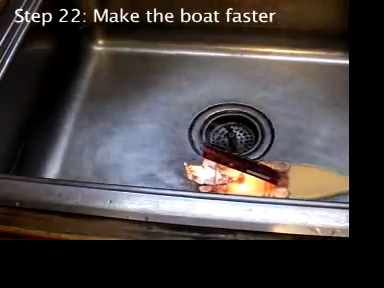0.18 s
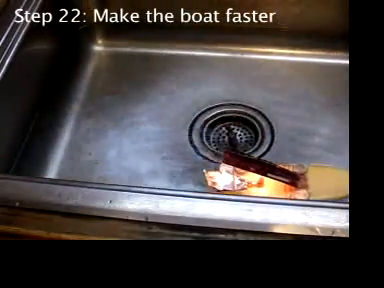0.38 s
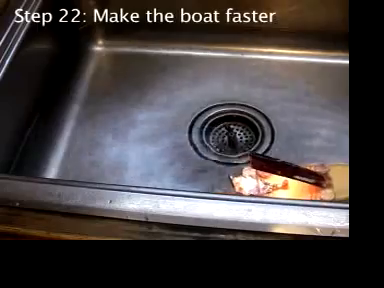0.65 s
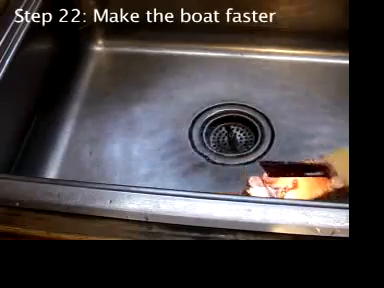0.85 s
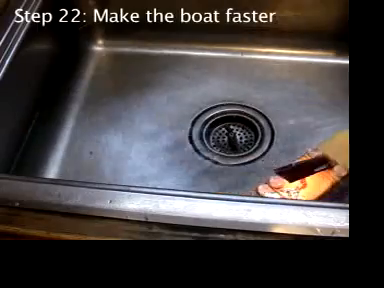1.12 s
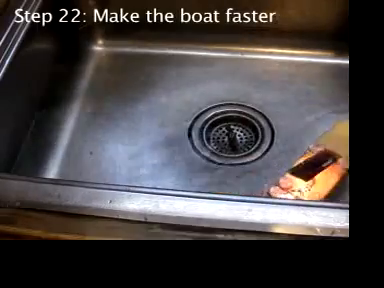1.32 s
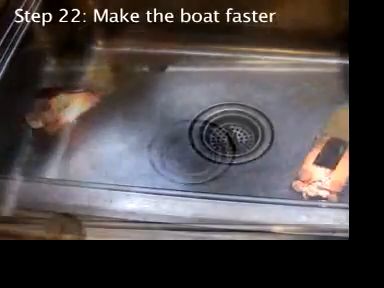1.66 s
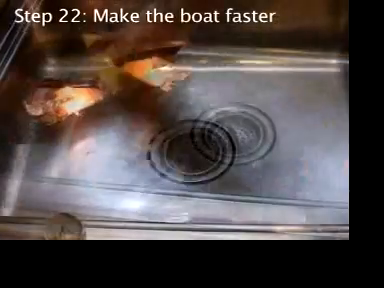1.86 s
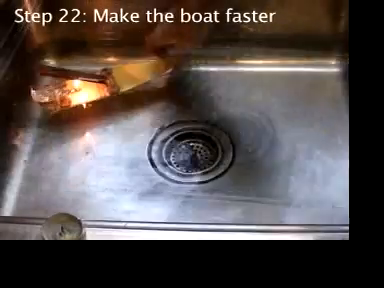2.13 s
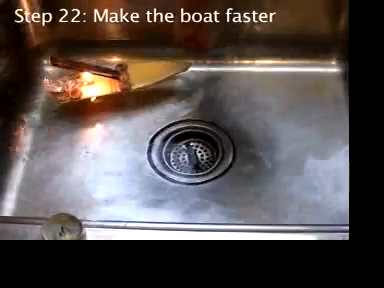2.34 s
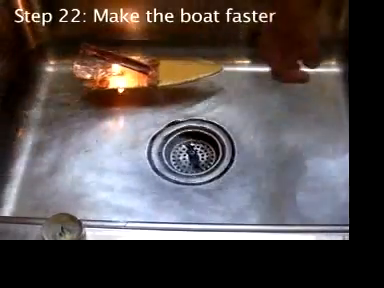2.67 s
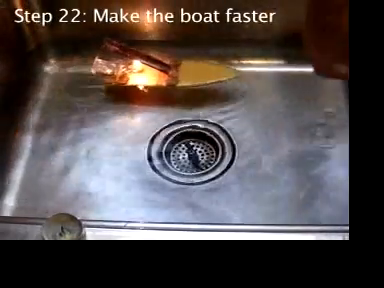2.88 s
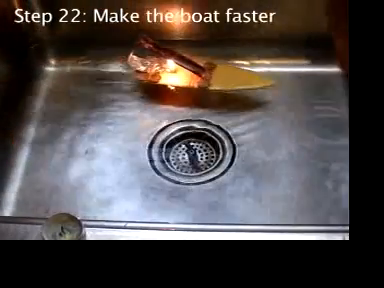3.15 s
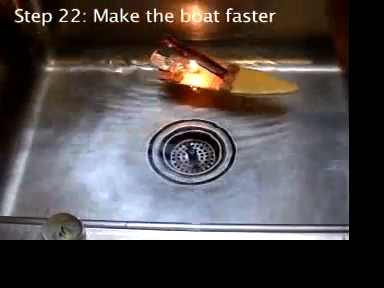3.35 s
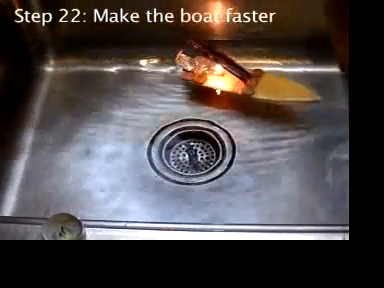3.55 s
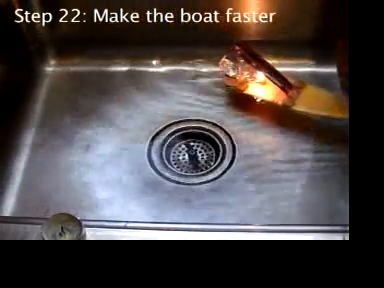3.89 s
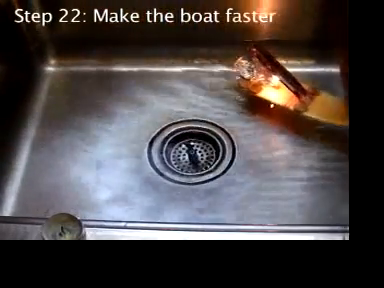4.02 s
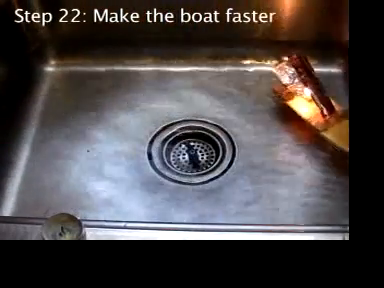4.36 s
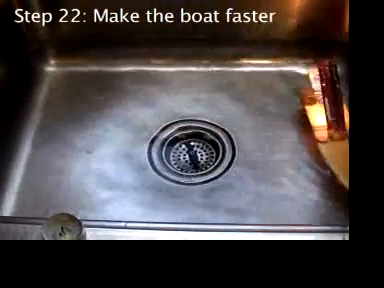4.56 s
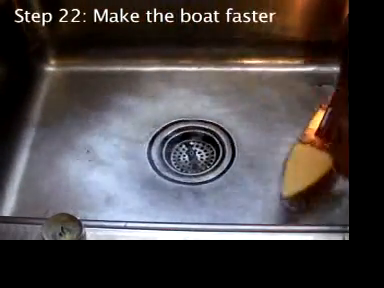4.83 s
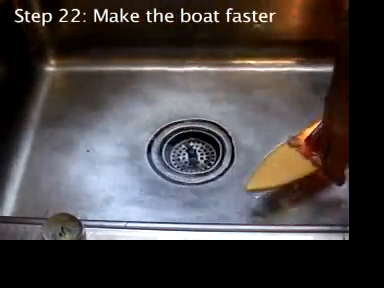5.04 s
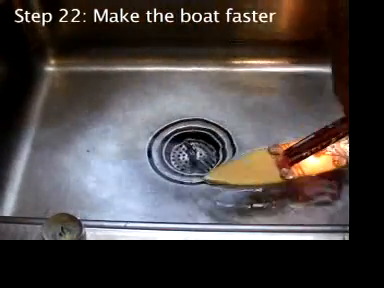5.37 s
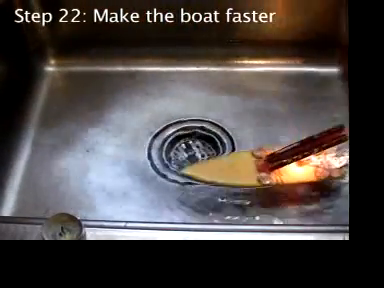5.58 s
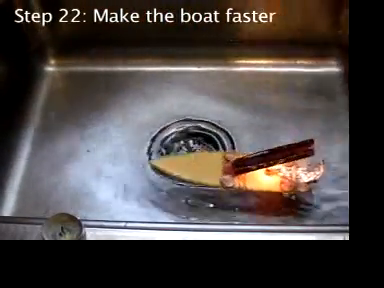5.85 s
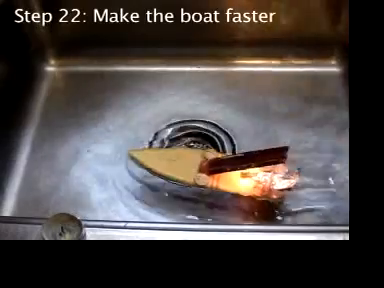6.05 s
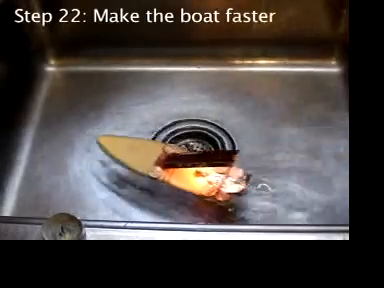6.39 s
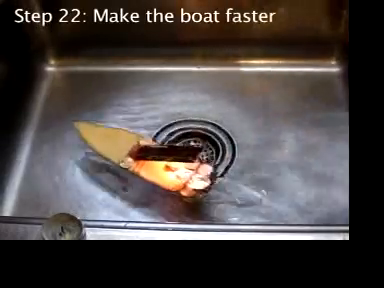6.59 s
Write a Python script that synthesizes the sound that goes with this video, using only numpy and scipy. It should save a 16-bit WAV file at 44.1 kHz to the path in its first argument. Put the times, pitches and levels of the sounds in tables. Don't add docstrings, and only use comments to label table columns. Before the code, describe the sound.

Thin sheet metal snaps and creaks in a hard sink, drops out twice early on, then clatters steadily at about eight cycles a second.

```python
import sys
import numpy as np
from scipy import signal
from scipy.fft import rfft, irfft, next_fast_len
from scipy.io import wavfile
from scipy.ndimage import uniform_filter1d

SR = 44100
rng = np.random.default_rng(int(sys.argv[2]) if len(sys.argv) > 2 else 0)


def attenuation_scalar(level_db):
    decades = np.asarray(level_db, float) / 20
    return 10 ** decades


def master_out(mix):
    frames = np.transpose(np.atleast_2d(mix))
    ceiling = np.clip(frames, -1, 1)
    pcm = np.round(ceiling * 32767).astype(np.int16)
    wavfile.write(sys.argv[1], SR, pcm)


N = 295911
SPAN = 8192

# (first blow over the echoes [dB], sink boom [dB], t60 of the sink echoes [s])
NATURE = [
    (22.8, -4.5, 0.077),
    (14.8, 4, 0.097),
    (10.7, -2.5, 0.12),
    (15.5, -4.5, 0.061),
    (23.4, 3.5, 0.073),
    (17.4, -6.5, 0.071),
    (17.5, 4.5, 0.071),
]


def boiler():
    # (frequency [Hz], side against mid [dB])
    width = [(60, -11), (240, -23), (950, -21.5), (3770, -13), (15000, 0.5)]
    kinds = near_wall() + open_water()
    mid, side = attenuation_scalar(-2.5) * sum(snaps(rows, kind) for kind, rows in enumerate(kinds))
    side = filtered(side, lambda hz: attenuation_scalar(along(width, hz)))
    return np.array([mid + side, mid - side]), mid


def near_wall():
    # (pop out [s], level [dB], treble over level [dB], time until sucked back [ms], creak [dB])
    cycles = [(0.0903, -13.5, -14, 35, -70), (0.3981, -15, -7, 41, -25), (0.5069, -13.5, -6, 41, -27),
              (0.622, -18, -17.5, 36.6, -28), (0.7349, -17, -8.5, 34.4, -70),
              (1.058, -15, -18.5, 35.6, -26.5), (1.1654, -14.5, -17, 41.5, -25),
              (1.2721, -16.5, -16, 45.6, -22.5), (1.3773, -14.5, -11.5, 47.3, -20.5),
              (1.4826, -15, -10.5, 49, -22.5), (1.5908, -14.5, -11, 46.6, -21.5),
              (1.6937, -16, -5.5, 47.5, -25)]
    # (from [s], ring of pop out [Hz], ring of fall back [Hz])
    bending = [(0, 2026, 1300), (.3, 1890, 1050), (.46, 3200, 1340), (.58, 1470, 1600), (.7, 1860, 950),
               (1.01, 2013, 1700)]
    # (base [dB], per dB of level over -16 [dB], per dB of treble over -12 [dB])
    out_low = (-1.1, -1.16, -0.28)
    # (level [dB], low [dB], treble [dB])
    fall = (-24, 4.7, -0.98)
    # (time [s], level [dB], low [dB], treble [dB], ring [Hz])
    stall = [(0.0005, -25.5, -4, -11, 1950), (0.039, -27.5, -1.5, -21, 1510), (0.2516, -27.5, 3, -29, 1220),
             (0.2671, -27.5, 2.2, -20, 1010), (0.348, -27, 4.5, -26, 1220), (0.359, -36, 2, 7, 1500),
             (0.3693, -29, 2, -16, 980), (0.9623, -68, 38, 5, 613), (1.004, -29, 6.5, -20, 1585),
             (1.028, -30, -5, -17, 1000), (1.901, -28.5, 0.5, -23, 1220)]
    s, db, treble_db, back_ms, creak_db = np.transpose(cycles)
    out_hz, back_hz = held(bending, s)
    low_db = np.dot(out_low, [1 + 0 * s, db + 16, treble_db + 12])
    out = np.transpose([s, db, low_db, treble_db, out_hz])

    back_s = s + back_ms / 1000
    fall_db, fall_low_db, fall_treble_db = fall
    falls = zip([0.012, *back_s], [-22, *db], [back_hz[0], *back_hz])
    back = [(t, fall_db + 0.08 * (pop_db + 16), fall_low_db, fall_treble_db, hz) for t, pop_db, hz in falls]

    creak = []
    for t, level in zip(back_s, creak_db):
        creak.append((t + 0.042, level, -2.5 - 1.3 * max(level + 25, -6), -26, 985))
    slip = [(t + 0.014, -35.5, 7.2, -17, 1610) for t in back_s if t > 1]
    return [out, back, sorted(creak + slip + stall)]


def open_water():
    # (rim lifts [s], middle sticks before the pop [ms], lift to suck [ms], suck to settle [ms])
    beat = [(1.9829, 19.5, 47, 21.7), (2.2189, 17.6, 53.7, 16.2), (2.5711, 11.8, 46.4, 15.7),
            (2.8006, 14, 51, 18.8), (3.0368, 17.5, 53.4, 17), (3.2726, 18.1, 52.5, 18),
            (3.5078, 26, 55.4, 17), (3.6277, 20.5, 54, 15.7), (3.8657, 19.8, 54.8, 17),
            (4.1024, 29, 53, 21), (4.2224, 30.5, 52, 19), (4.3411, 24.5, 56.9, 20.2),
            (4.9486, 17.4, 53.5, 16.5), (5.3054, 14.9, 48, 13.5), (5.5365, 14.4, 51.5, 12.2),
            (5.7712, 13.9, 52.4, 17), (6.2469, 20.8, 53.8, 15.1), (6.602, 24.7, 54.4, 16.7)]
    marked = [0, 2, 5, 7, 9, 11, 13, 14, 16, 18, 19, 20, 25, 28, 30, 32, 36, 39]
    # (time [s], lift [dB], pop [dB], suck [dB], settle [dB])
    strength = [(1.98, -18.5, -14.5, -19.5, -18), (2.102, -20.5, -14.5, -18.5, -20.5),
                (2.34, -19, -15, -17, -20.5), (2.539, -16.5, -15.5, -20.5, -20.5),
                (2.80, -18.5, -16, -20, -22), (3.04, -19.5, -14, -21.5, -22.5),
                (3.51, -21.5, -13, -31, -26), (3.75, -22, -13, -40, -24.5), (4.10, -25, -11.5, -29, -26.5),
                (4.34, -20.5, -14, -23.5, -26), (4.46, -22.5, -14.5, -19, -26),
                (4.71, -22, -15.5, -18.5, -20.5), (4.95, -18.5, -16, -18, -22.5),
                (5.19, -21, -16, -24, -21.5), (5.42, -22.5, -17, -21, -22.5),
                (5.89, -22, -17.5, -17.5, -22.5), (6.13, -21, -15, -24, -21),
                (6.60, -23, -14.5, -26.5, -26.5)]
    # (from [s], ring of lift [Hz], of pop [Hz], of suck [Hz])
    ring = [(1.95, 2420, 1930, 2400), (2.4, 2700, 2150, 2400), (2.63, 2700, 2400, 1200),
            (2.98, 2700, 2330, 1170), (3.57, 2700, 2800, 1060), (3.93, 1400, 2800, 1440),
            (4.16, 2930, 2900, 1590), (4.52, 1090, 1770, 1320), (5.01, 1040, 2730, 1240),
            (5.25, 1020, 2300, 1460), (5.83, 1000, 2800, 1320), (6.31, 2650, 2500, 1250)]
    # (time [s], facing [dB])
    facing = [(1.98, 1.9), (2.7, -4.5), (3.2, 3), (3.7, -5), (4.2, -4.7), (4.6, -2), (5.3, 3), (5.8, 3.2),
              (6.6, 3)]
    # (time [s], level [dB], low [dB], treble [dB], ring [Hz])
    odd = [
        (1.8233, -16.5, 1.5, -10.5, 1220),
        (1.8622, -21, 3, -1.5, 1100),
        (1.9378, -18.5, 2, -4, 1240),
        (4.031, -35, 1, -20, 1550),
        (4.056, -25.5, 1.2, -7, 1530),
    ]
    # (usual [dB], per dB stronger [dB], per ms stuck [dB], per dB of facing [dB], if the ring is deep [dB])
    low_law = [
        (-2.5, -0.3, 0.17, 0.74, 2.5),
        (-7, -0.94, -0.14, 0.04, .1),
        (-2.5, -0.75, 0.13, 0.6, 8),
        (-0.54, -0.08, 0.13, -0.14, 1),
    ]
    treble_law = [
        (-5.5, -0.54, -0.27, 0.46, -0.24),
        (-9, 0.51, 0.62, 1, .1),
        (-6, -0.73, 0.14, 0.5, -1.2),
        (-5.5, 0.11, -0.1, 0.38, -0.41),
    ]
    usual_db, usual_stick_ms, deep_hz = (-21, -15, -24, -24), 18, 1700
    missed = 17

    cycle = np.arange(marked[-1] + 1)
    s, stick_ms, suck_ms, settle_ms = [np.interp(cycle, marked, column) for column in np.transpose(beat)]
    when, *strength_db = np.transpose(strength)
    ring_hz = held(ring, s)
    facing_db = np.interp(s, *np.transpose(facing))
    kinds = []
    for k, after_ms in enumerate((0 * s, stick_ms, suck_ms, suck_ms + settle_ms)):
        db = np.interp(s, when, strength_db[k])
        deep = ring_hz[min(k, 2)] < deep_hz
        cause = [1 + 0 * s, db - usual_db[k], stick_ms - usual_stick_ms, facing_db, deep]
        low_db, treble_db = np.dot(low_law[k], cause), np.dot(treble_law[k], cause)
        rows = np.transpose([s + after_ms / 1000, db, low_db, treble_db, *ring_hz[k:k + 1]])
        if k == 0:
            kinds.append(sorted(odd + [tuple(row) for row in rows]))
        else:
            kinds.append(rows[cycle != missed])
    return kinds


def held(table, s):
    table = np.array(table)
    return table[np.searchsorted(table[:, 0], s) - 1, 1:].T


def snaps(rows, kind):
    # (time [s], blow [dB])
    distance = [(0, -3), (1, 1.5), (1.9, 1), (2.5, 1), (3.2, 0.5), (3.7, 5.5), (4.2, 2), (4.9, -.6),
                (5.6, 0), (6.7, 1)]
    blow_db, _, t60 = NATURE[kind]
    count = len(rows)
    t, hz = np.arange(SPAN) / SR, np.fft.rfftfreq(SPAN, 1 / SR)

    lumps = np.tanh(unit(uniform_filter1d(drifting(count, keep=0.872), size=60, axis=1)))
    fade = attenuation_scalar(-60 * t / t60 + 5 * lumps) * (1 - np.exp(-(t / 0.002) ** 2))
    scatter = 1 / (1 + (650 / (hz + 1)) ** 4) / np.hypot(1, hz / 7000)

    hard_db = 0.3 * np.array([[row[3] + 8] for row in rows])
    far_db = np.interp([[row[0]] for row in rows], *np.transpose(distance))
    force = attenuation_scalar(blow_db + hard_db + far_db)
    # above 3200 Hz the blow is a ragged tear, below it one clean push
    tear = (t / 0.0005) ** 2 * np.exp(-t / 0.0005) * drifting(count, keep=0.8)
    ragged = rfft(tear) / np.linalg.norm(tear, axis=1, keepdims=True)
    clean = np.exp(-2j * np.pi * hz * 0.000742)
    high = 1 / (1 + (3200 / (hz + 1)) ** 4)
    blow = -force * ((1 - high) * clean + high * ragged)

    patches = unit(uniform_filter1d(drifting(count, keep=0.58), size=60, axis=1))[:, :len(hz)]
    gain = snap_gain(rows, kind) * attenuation_scalar(28 + 2.5 * high * patches)
    out = np.zeros((2, N + SPAN))
    for channel, share in enumerate((1, 0)):
        push = rfft(drifting(count, keep=0.935) * fade) * scatter + share * blow
        even = np.sqrt(uniform_filter1d(np.abs(push) ** 2, size=36, axis=1))
        waves = irfft(push * causal(gain / even))
        for (s, *_), wave in zip(rows, waves):
            out[channel, round(s * SR):][:SPAN] += wave
    return out[:, :N]


def snap_gain(rows, kind):
    # (frequency [Hz], width [Hz], level [dB])
    colour = [
        [(980, 92, 16), (2027, 590, -1.5), (2650, 29, 0.5), (3365, 156, -3)],
        [(1127, 150, 21), (1540, 400, 16.5), (2950, 1250, 6), (4980, 380, -3.5)],
        [(980, 130, 18.5), (1375, 290, 9), (2260, 230, -5)],
        [(1060, 244, 13), (2700, 1300, 9.5), (3400, 100, -61), (5300, 690, -55)],
        [(730, 320, -1), (1560, 390, 10.5), (2330, 550, 21), (4360, 410, -5)],
        [(1197, 320, 15), (2340, 640, 2), (3570, 340, 5.5), (4940, 490, 0)],
        [(1057, 140, 24.5), (1356, 105, 24.5), (1790, 250, 17), (2900, 1400, 8)],
    ]
    ring_db = [7.6, 13, 18.5, 15.2, 15, 16.6, 14]
    # (frequency [Hz], level [dB])
    broad = [(25, -66), (150, -10), (600, -17), (3000, -3), (6000, -3), (10000, -10.5), (12500, -27),
             (16000, -25)]
    # (frequency [Hz], width [Hz], level [dB])
    air = [(216, 11, 10.5), (306.7, 55.5, 13.5), (423.6, 37.5, 13.5)]
    # (time [s], 541 Hz mode [dB], 622 Hz mode [dB], third mode [dB], deep modes [dB])
    boat_place = [(0, 9, 18, 9.8, -2), (.8, 20.5, 17.5, 6.4, 0.5), (1.05, 20.5, 19.5, 14, -4),
                  (1.7, 20, 22, 8.8, 3), (1.85, 22, -28, 12, -1.3), (2.7, 23.5, -30, 21.3, 3),
                  (3.598, 19, -14, 9.5, -2.8), (4.6, 15, 4, 14, -1.5), (5.5, 3, 15, 11.8, -2.5),
                  (6.2, -5, 8, 13, -4), (6.7, -24, 3, 3.7, -8)]
    # (time [s], frequency [Hz])
    third = [(1.8, 800), (4.3, 786), (4.8, 730), (5.4, 640), (6.7, 616)]
    hz = np.fft.rfftfreq(SPAN, 1 / SR)
    s, db, low_db, treble_db, *ring = np.transpose(rows)[:, :, None]
    when, *place = np.transpose(boat_place)
    first_db, second_db, third_db, deep_db = [np.interp(s, when, column) for column in place]
    third_hz = np.interp(s, *np.transpose(third))
    bowl = [(centre, width, level + deep_db) for centre, width, level in air]
    bowl += [(541, 66, first_db), (622, 78, second_db), (third_hz, 110, third_db)]

    stray = 1 + 0.03 * rng.standard_normal((len(rows), 8)).T[:, :, None]
    modes = colour[kind] + [(ring_hz, 130, ring_db[kind]) for ring_hz in ring]
    tones = peaks([(centre * u, width, level) for (centre, width, level), u in zip(modes, stray)], hz)
    boom = attenuation_scalar(NATURE[kind][1]) * peaks(bowl, hz)
    gain = attenuation_scalar(along(broad, hz)) * (0.27 + tones + boom)

    low = 1 / (1 + (hz / 1700) ** 10)
    treble = 1 / (1 + (4000 / (hz + 1)) ** 10)
    out = 0
    for part, part_db in ((low, low_db), (1 - low - treble, 0), (treble, treble_db)):
        size = np.sqrt(np.mean((gain * part * (hz > 500)) ** 2, axis=1, keepdims=True))
        out = out + gain * part / size * attenuation_scalar(db + part_db)
    return out


def peaks(modes, hz):
    return sum(attenuation_scalar(db) / (1 + (2 * (hz - centre) / width) ** 2) for centre, width, db in modes)


def drifting(count, keep):
    fresh = rng.standard_normal((count, SPAN))
    keep = np.clip(keep, 0, 0.99)
    return signal.lfilter([np.sqrt(1 - keep ** 2)], [1, -keep], fresh, axis=0, zi=keep * fresh[-1:])[0]


def causal(gain):
    cepstrum = irfft(np.log(gain + 1e-6))
    cepstrum[:, 1:SPAN // 2] *= 2
    cepstrum[:, SPAN // 2 + 1:] = 0
    return np.exp(rfft(cepstrum))


def unit(x):
    return x / np.sqrt(np.mean(x ** 2) + 1e-20)


def along(points, hz):
    f, v = np.transpose(points)
    return np.interp(np.log(hz + 1), np.log(f + 1), v)


def filtered(x, response):
    m = next_fast_len(N + SPAN)
    return irfft(rfft(x, m) * response(np.fft.rfftfreq(m, 1 / SR)), m)[..., :N]


def kitchen(x):
    # (frequency [Hz], t60 [s])
    decay = [(150, 0.2), (3000, 0.3), (12000, 0.18)]
    hz, t, z = signal.stft(rng.standard_normal((2, SR // 2)), SR, nperseg=256)
    fade = attenuation_scalar(-60 * t / along(decay, hz)[:, None])
    mid, side = signal.istft(z * fade, SR, nperseg=256)[1]
    tail = np.array([mid + 0.072 * side, mid - 0.28 * side])
    late = np.pad(x, (400, 0))[None]
    return signal.fftconvolve(late, tail / np.linalg.norm(tail[0]), axes=1)[:, :N]


def rumble():
    # (time [s], level [dB])
    swell = [
        (0, -61),
        (.6, -53.5),
        (2.4, -64),
        (2.8, -50),
        (3.5, -75),
        (6.7, -67),
    ]
    s, db = np.transpose(swell)
    low = filtered(rng.standard_normal((2, N)), lambda hz: peaks([(80.6, 130, 0)], hz))
    return attenuation_scalar(np.interp(np.arange(N) / SR, s, db)) * unit(low)


def hush():
    # (frequency [Hz], density [dB per Hz])
    tone = [(25, -34), (80, -9.5), (400, -6), (600, -10), (1500, -20), (11000, -30), (16000, -36)]
    # (frequency [Hz], rms level [dB])
    whines = [
        (8000, -72),
        (11450, -74),
    ]
    mid, side = filtered(rng.standard_normal((2, N)), lambda hz: attenuation_scalar(along(tone, hz)))
    size = attenuation_scalar(-49.5) / np.std(mid)
    side = filtered(side, lambda hz: attenuation_scalar(along([(60, 1.5), (400, 0.34), (6000, 1)], hz)))
    t = np.arange(N) / SR
    whine = sum(np.sqrt(2) * attenuation_scalar(db) * np.sin(2 * np.pi * hz * t) for hz, db in whines)
    return size * np.array([mid + side, mid - side]) + whine


def scene():
    boat, mid = boiler()
    near_and_room = boat + attenuation_scalar(-12) * kitchen(mid)
    return near_and_room * attenuation_scalar([[-0.45], [0.45]]) + hush() + rumble()


def roll_off(x):
    return signal.sosfilt(signal.butter(12, 16510, fs=SR, output="sos"), x)


def record(dry):
    dry = filtered(dry, lambda hz: np.where(hz < 15750, 1, attenuation_scalar(-20)))
    mix = dry / (1 + np.abs(dry / 1.02) ** 8) ** (1 / 8)
    return roll_off(mix)


dry = scene()
out = record(dry)
master_out(out)
```